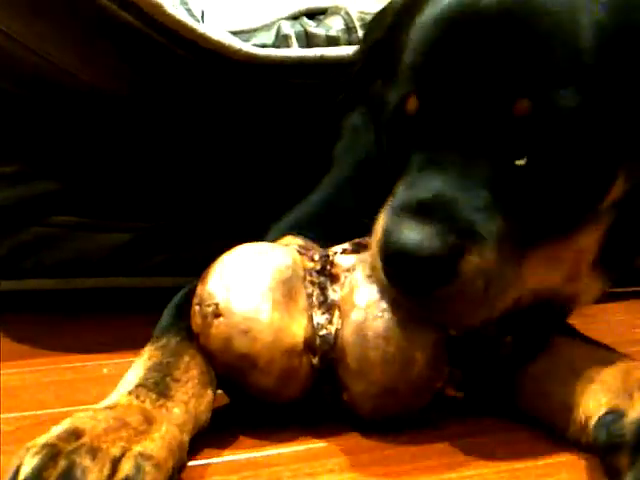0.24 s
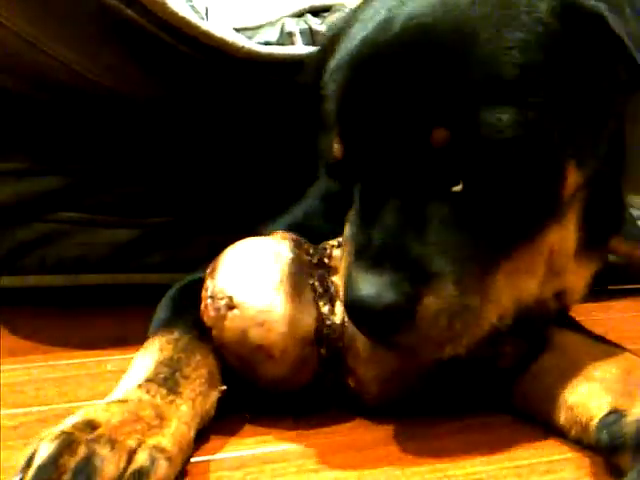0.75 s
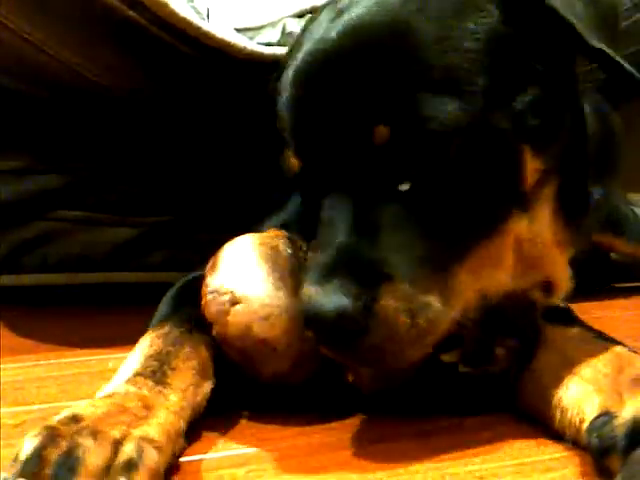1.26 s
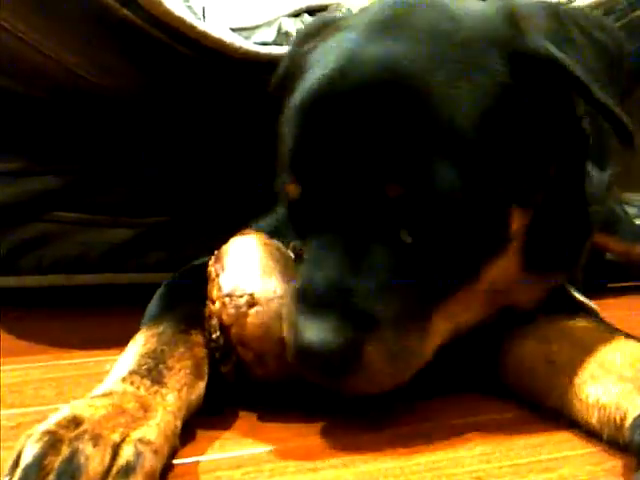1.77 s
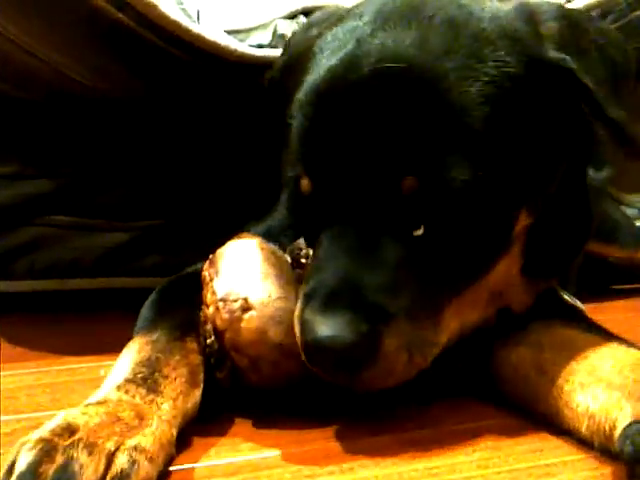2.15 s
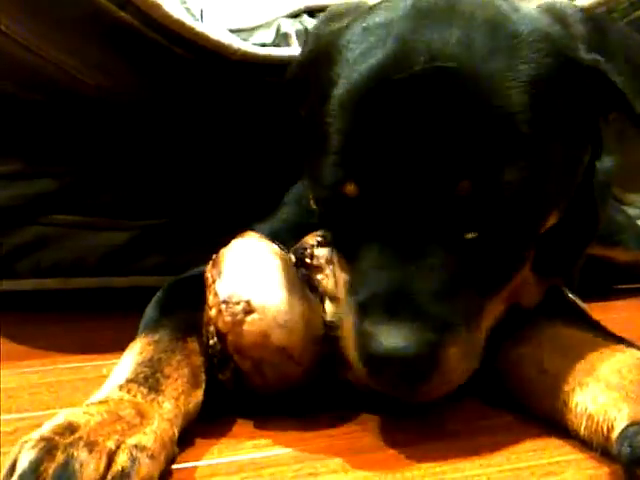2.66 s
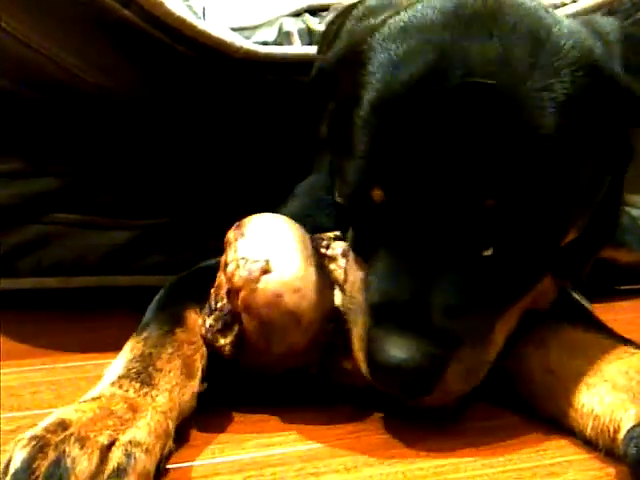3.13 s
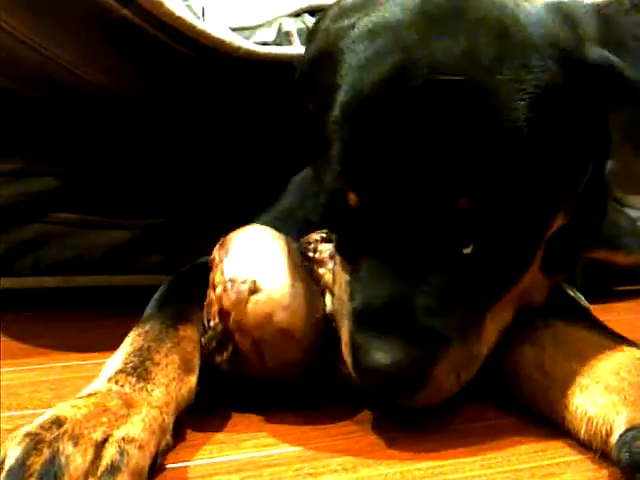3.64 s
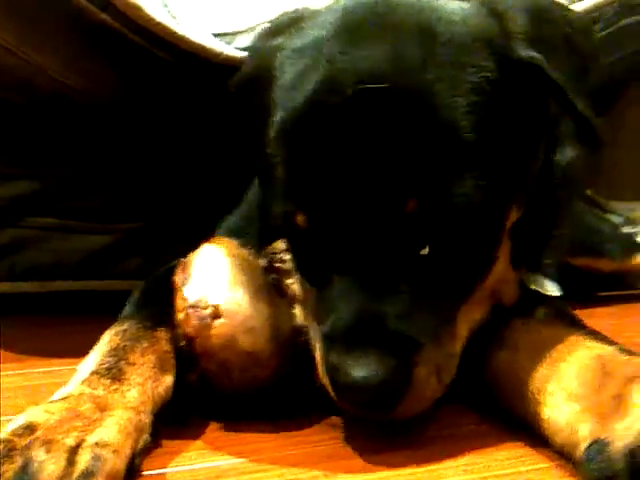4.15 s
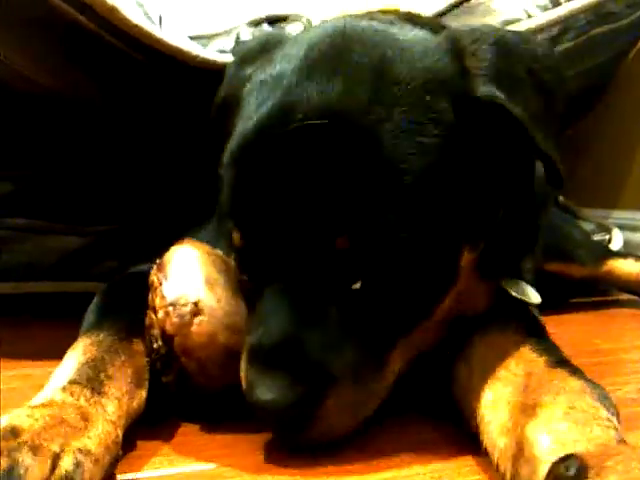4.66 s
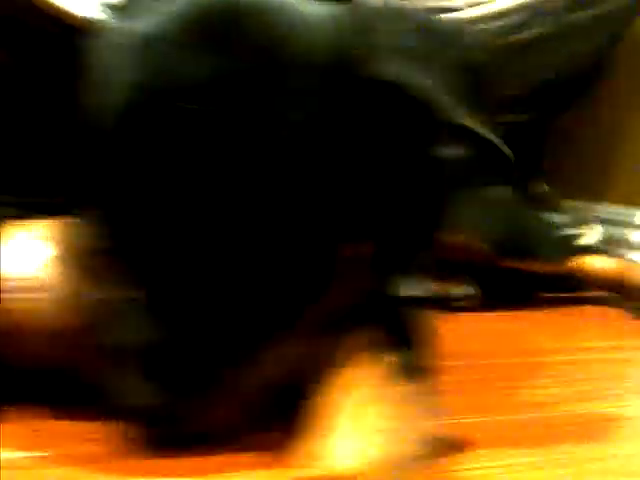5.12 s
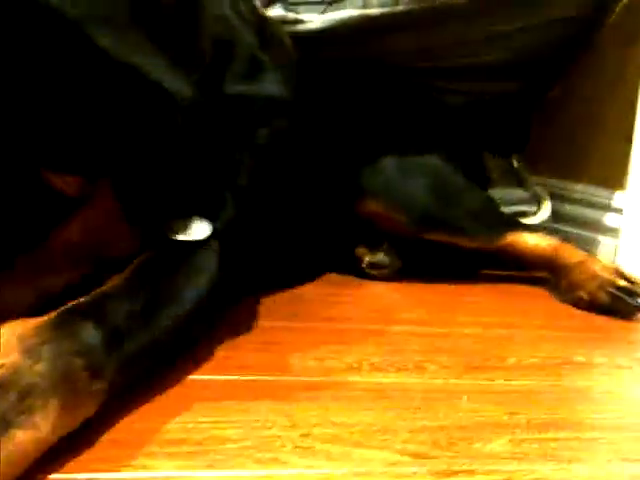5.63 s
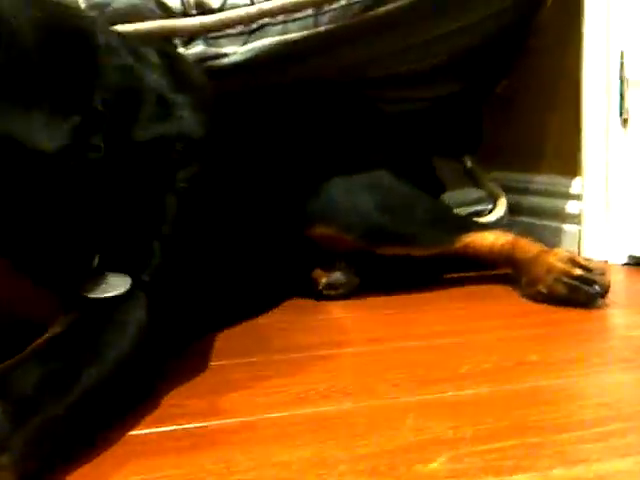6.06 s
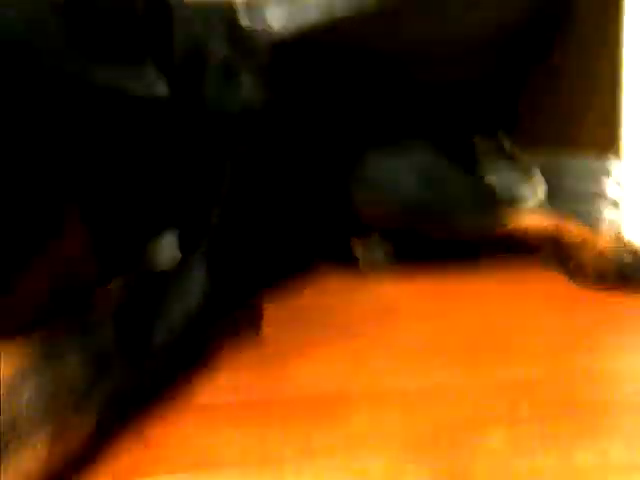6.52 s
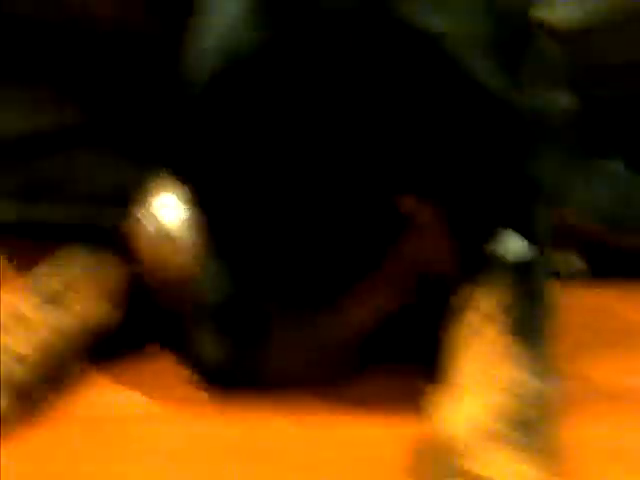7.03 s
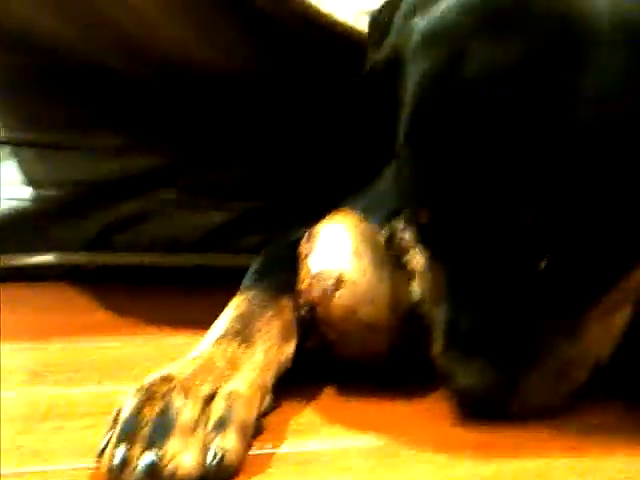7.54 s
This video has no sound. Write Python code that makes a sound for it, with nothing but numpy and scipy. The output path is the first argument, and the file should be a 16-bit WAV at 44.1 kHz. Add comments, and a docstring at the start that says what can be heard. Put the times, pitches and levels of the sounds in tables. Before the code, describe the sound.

A puppy gnaws a large bone on a wooden floor, heard close up in a small room with a short echo and a faint low rush. In the first half second, teeth snap and crunch and the bone slides briefly. Soft bumps of paws and jaw follow, with a cluster of hollow knocks from 1.2 to 1.5 seconds. Light tooth clicks come between 1.8 and 2.4 seconds, then small crunchy knocks. The loudest knocks of bone on boards land at about 3.3, 3.9 and 4.4 seconds, with a quick burst of splintering clicks just before the last. Dull thuds follow near 5.1 and 5.6 seconds. From 6.2 to 7.5 seconds the teeth click, nibble and grate busily, among short slides and lighter knocks. A faint, smooth hiss swells and fades twice, peaking around 5.5 and 7.1 seconds.

```python
"""Puppy gnawing a bone

A puppy chews a big knuckle bone on a wooden floor in a small, echoing room. The bone rocks,
knocks and slides, making the boards ring. Teeth click, scrape and splinter it, while paws and
jaw bump it softly. Twice a smooth hiss swells and fades."""
import sys
import numpy as np
from scipy import signal
from scipy.fft import rfft, irfft
from scipy.io import wavfile

SR = 44100
rng = np.random.default_rng(int(sys.argv[2]) if len(sys.argv) > 2 else 0)


def wav_record(signal):
    """Record a signal, one row per channel, as 16-bit PCM in the file named by sys.argv[1]."""
    frames = np.transpose(np.atleast_2d(signal))
    bounded = np.clip(frames, -1, 1)
    # unit amplitude maps onto the largest positive 16-bit level
    quanta = np.round(bounded * 32767).astype(np.int16)
    wavfile.write(sys.argv[1], SR, quanta)


N = 343539

# Tones of bone and boards together: pitch_hz, level_db, ring_s (time to fade by 60 dB)
BONE_TONES = [(205.8, -23.5, 0.21), (280, -4, 0.027), (430, -0.1, 0.039), (512, -2.5, 0.022),
              (722, 2, 0.014), (1198, 11.5, 0.0053), (1530, -19.5, 0.025), (2160, -12, 0.0084),
              (2490, -9.5, 0.011), (3150, -8, 0.0053), (3780, -13, 0.017), (3630, 20, 0.00021)]
# Bare bone hitting the floor: start_s, level_db, hardness_hz (higher is sharper), crunch_db, pitch_ratio
BONE_KNOCKS = [(0.1574, -38.5, 750, -37, 0.88), (0.7012, -40, 640, -25, 1.04),
               (0.7863, -48.5, 800, -39, 1.03), (1.2154, -30, 850, -25.5, 1),
               (1.3829, -25.5, 800, -25, 0.99), (1.4589, -31, 750, -26, 0.98),
               (2.6754, -31.5, 700, -21, 1.01), (2.9117, -40.5, 720, -16.5, 1),
               (3.3009, -16.5, 950, -21, 1.036), (3.332, -32.5, 700, -32, 1.73),
               (3.342, -27.5, 750, -39, 1.36), (3.8544, -17.5, 740, -23.5, 1),
               (4.3856, -18.5, 1005, -16.5, 1.065), (4.4, -31, 700, -40, 0.82),
               (5.0792, -40, 644, -37, 0.84), (6.6632, -35.5, 1300, -37, 0.92),
               (6.8567, -42, 1050, -29, 0.82), (6.873, -43, 700, -34, 1.08), (7.4307, -31, 850, -19, 1.03)]

def knocks():
    """The bone drops on the boards and both ring; how it is held shifts the pitch."""
    return blows(BONE_KNOCKS, BONE_TONES, BONE_TONES, crunch_s=0.0078, crunch_hz=3650,
                 chatter_s=0.00908, chatter_db=-10.5, chatter_hz=1500,
                 edge_hz=2630, gain_db=2.5, order=2)


# The floor bending under a slow, heavy push: pitch_hz, level_db, ring_s
FLOOR_TONES = [(170.8, -7, 0.046)]
# Padded bumps of paws and jaw: start_s, level_db, hardness_hz, crunch_db
SOFT_BUMPS = [(0.2645, -38.5, 550, -11), (0.318, -43, 168, -33), (0.35, -34.5, 290, -41),
              (0.6635, -44, 201, -35), (0.768, -38, 197, -32), (0.981, -52, 170, -36),
              (1.078, -40.5, 167, -45), (1.1448, -37, 180, -30), (1.323, -36, 280, -17),
              (1.3435, -29, 260, -27.5), (1.4102, -29, 310, -22), (1.8645, -35.5, 159, -26),
              (2.0637, -47, 265, -31), (2.2808, -43.5, 395, -25), (2.8958, -40.5, 352, -7.5),
              (3.6009, -30, 197, -22.5), (3.6083, -32, 417, -7), (4.0782, -27, 516, -15),
              (4.178, -38.5, 300, -16.5), (4.251, -31, 250, -21), (4.3513, -34.5, 318, -16),
              (4.771, -38.5, 170, -26.5), (5.0585, -24, 340, -24.5), (5.216, -43, 300, -22),
              (5.5582, -28, 305, -19), (5.8009, -47.5, 400, -12), (6.2823, -36.5, 220, -28.5),
              (6.496, -40, 150, -26), (6.992, -41.5, 169, -37), (7.637, -43.5, 205, -23)]

def bumps():
    """Paws and jaw push the bone against the boards with a soft thud and a dull crunch."""
    contacts = [(*bump, 1) for bump in SOFT_BUMPS]   # pitch ratio 1
    return blows(contacts, FLOOR_TONES + BONE_TONES, BONE_TONES, crunch_s=0.0078, crunch_hz=1550,
                 chatter_s=0.01157, chatter_db=-8, chatter_hz=900,
                 edge_hz=9200, gain_db=-2.5, order=3)


# Tones of a tooth hitting bone: pitch_hz, level_db, ring_s
TOOTH_TONES = [(476, -2, 0.0083), (800, 5.5, 0.043), (940, 18.5, 0.0032), (1500, 1, 0.0022),
               (2030, -2, 0.059)]
# The thin ring of splintering bone: pitch_hz, level_db, ring_s
SPLINTER_TONES = [(2114, -2, 0.05), (4330, 2.5, 0.0066), (5470, 4.5, 0.006), (5840, -8.5, .005)]
# Teeth snapping over the bone: start_s, level_db, hardness_hz, crunch_db, pitch_ratio
TOOTH_SNAPS = [(.2205, -31, 750, -20, 0.99), (.2544, -38, 900, -11, 0.8), (.3172, -25, 1270, -5, 0.99),
               (.3462, -39.5, 900, 2, 0.93), (.451, -35, 710, -26, 1.23), (.4945, -40, 1070, 0.5, 1),
               (1.146, -39, 800, -21, 0.79), (1.788, -42.5, 1600, 0, 0.82), (1.8245, -44.5, 1600, -4, 1.04),
               (1.8545, -38.5, 1100, -12, 1.05), (1.884, -49, 900, -12, 1.5), (1.911, -48, 900, -14, 1),
               (1.9314, -41.5, 940, -9, 1.02), (1.977, -40, 900, -16, 1), (2.014, -53, 1200, -16, 1.5),
               (2.283, -47, 700, -22, 0.83), (2.299, -45, 700, -20, 0.98), (2.317, -55, 1500, 3, 0.84),
               (2.422, -51, 900, -17, 1.07), (4.156, -40, 1100, -10, 1.15), (4.177, -32, 800, -22, 0.98),
               (4.1975, -36.5, 1100, -8, 1.06), (4.2435, -33, 1100, -5, 0.95), (4.2505, -44, 1100, 2, 1.14),
               (4.272, -32.5, 1350, -11, 0.88), (4.2895, -29.5, 1220, -9, 1),
               (4.8688, -41.5, 1300, -11, 0.93), (6.164, -47.5, 1003, -7, 1.07),
               (6.2832, -43.5, 750, -18, 0.86), (6.371, -47, 1910, -7, 1.2), (6.4008, -41, 1300, -14, 0.79),
               (6.4974, -30.5, 2400, -9, .96), (6.628, -36.5, 900, -20.5, 0.97),
               (6.774, -45, 3000, 12, 1.1), (6.8326, -40, 900, -23, 0.76), (6.9005, -43, 1200, -16, 1),
               (6.9345, -38.5, 800, -17, 1.1), (7.102, -45.5, 1290, -18, 0.81),
               (7.204, -38.5, 900, -18, 0.89)]

def teeth():
    """A tooth slips off a ridge and clacks on the bone, which splinters with a sharp snap."""
    return blows(TOOTH_SNAPS, TOOTH_TONES, SPLINTER_TONES, crunch_s=0.0028, crunch_hz=5800,
                 chatter_s=0.00475, chatter_db=-6.0, chatter_hz=3000,
                 edge_hz=2700, gain_db=-9.5, order=2)


# Tones of a tooth's edge on the spongy end of the bone: pitch_hz, level_db, ring_s
GRATING_TONES = [(790, 5.5, 0.013), (1100, 3.5, 0.011), (1500, 13.5, 0.0027), (1850, -6.5, 0.0069),
                 (2113, 1.5, 0.052)]
# Strokes of the teeth: middle_s, length_s, level_db
TOOTH_RASPS = [(.311, 0.012, -49), (4.27, 0.11, -60), (6.332, 0.025, -46), (6.409, 0.015, -55.5),
               (6.503, 0.042, -42), (6.53, 0.17, -57.5), (6.58, 0.015, -50.5), (6.645, 0.025, -51),
               (7.105, 0.025, -49), (7.21, 0.034, -52), (7.275, 0.049, -49), (7.49, 0.041, -50),
               (7.54, 0.014, -42)]

def rasps():
    """Teeth drag over the rough bone and grate."""
    return scraping(TOOTH_RASPS, GRATING_TONES, slips_per_s=390, spread_db=3.0, edge_hz=1800, order=6)


# Slides across the floor: middle_s, length_s, level_db
BONE_SLIDES = [(.1, 0.15, -57.5), (.16, 0.044, -46), (.195, 0.013, -51), (.455, 0.15, -43),
               (1.14, 0.0082, -52), (1.18, 0.018, -49), (1.335, 0.03, -40), (1.372, 0.025, -45),
               (2.93, 0.09, -46.5), (3.293, 0.079, -45), (4.22, 0.31, -49), (5.77, 0.14, -54.5),
               (6.68, 0.11, -43.5), (6.96, 0.096, -55), (7.215, 0.04, -62), (7.28, 0.023, -52),
               (7.538, 0.019, -46), (7.775, 0.11, -55)]

def slides():
    """The bone rubs along the boards with a dull scrape."""
    return scraping(BONE_SLIDES, BONE_TONES, slips_per_s=570, spread_db=-0.5, edge_hz=940)


# Hard bites: middle_s, length_s, level_db
HARD_BITES = [(.325, 0.043, -59), (4.185, 0.065, -64.5), (4.275, 0.1, -60.5), (6.505, 0.047, -60)]

def crunches():
    """The bone's crust gives way in a quick run of tiny cracks."""
    return scraping(HARD_BITES, SPLINTER_TONES, slips_per_s=600, spread_db=3.0, edge_hz=3400)


# Spells of nibbling: middle_s, length_s, level_db
NIBBLE_SPELLS = [(2.15, 0.88, -92), (6.05, 0.85, -70), (7.05, 0.41, -59.5)]

def nibbles():
    """Teeth catch lightly on the bone in small, uneven ticks."""
    return scraping(NIBBLE_SPELLS, GRATING_TONES, slips_per_s=63, spread_db=2.5, edge_hz=1420)


# Small wet crumbs splitting off: start_s, peak_db, pitch_hz
WET_CRUMBS = [(1.568, -47, 5840), (1.668, -49.5, 4860), (2.392, -56, 1100), (5.475, -44.5, 1250)]

def crumbs(snap_s=0.00094, width_octaves=0.45):
    """A wet crumb parts with a thin tick that lasts a few milliseconds."""
    out, t = np.zeros(N), np.arange(SR // 20) / SR
    half_width = 2 ** (width_octaves / 2)
    for start_s, peak_db, pitch_hz in WET_CRUMBS:
        burst = rng.standard_normal(len(t)) * t * np.exp(-t / snap_s)
        tick = band_pass(burst, pitch_hz / half_width, pitch_hz * half_width, order=4)
        add(out, start_s, from_db(peak_db) * tick / np.abs(tick).max())
    return out


# Spells of restless shifting: middle_s, length_s, level_db
RESTLESS_SPELLS = [(.27, 0.91, -54.5), (.72, 0.21, -51.5), (1.87, 0.34, -57), (4.22, 0.23, -53),
                   (6.5, 3, -62.5)]

def shifting(resting_db=-63, soft_hz=137):
    """Never quite still, paws and jaw keep nudging the bone against the boards."""
    nudges = low_pass(grains(per_s=76, spread_db=3.0), soft_hz)
    return (from_db(resting_db) + effort(RESTLESS_SPELLS)) * rms_one(ring(nudges, BONE_TONES))


def low_thump(start_s=3.301, peak_db=-38, top_hz=60):
    """A faint, very deep thump sounds under the loudest knock."""
    out, thump = np.zeros(N), low_pass(signal.unit_impulse(SR // 5), top_hz)
    add(out, start_s, from_db(peak_db) * thump / thump.max())
    return out


def blows(contacts, tones, crunch_tones, crunch_s, crunch_hz, chatter_s, chatter_db, chatter_hz,
          edge_hz, gain_db, order):
    """Each contact is a rattling push, longer when soft, plus a crunch; gain_db shifts every level."""
    out = np.zeros(N)
    for start_s, level_db, hardness_hz, crunch_db, pitch_ratio in contacts:
        touches = rattle(chatter_s, chatter_db, chatter_hz)
        push = low_pass(touches, hardness_hz, order)
        rounded_push = low_pass(push, edge_hz, order=4)
        crunch = from_db(crunch_db) * low_pass(grit(crunch_s), crunch_hz, order=3)
        sound = ring(rounded_push, tones, pitch_ratio) + ring(crunch, crunch_tones, pitch_ratio)
        sound *= np.sqrt(SR // 100) / np.linalg.norm(sound)   # the energy of 10 ms at strength 1
        add(out, start_s, from_db(level_db + gain_db) * sound)
    return out


def rattle(chatter_s, chatter_db, chatter_hz, count=4):
    """One touch, then a few weaker, duller ones as the surfaces settle on each other."""
    touches = np.zeros(SR // 5)
    when, strength = rng.random((2, count))
    after_s = chatter_s * (.15 + when)
    sizes = from_db(chatter_db) * (.5 + strength) * (1 - when / 2)
    np.add.at(touches, (after_s * SR).astype(int), sizes)
    return signal.unit_impulse(len(touches)) + low_pass(touches, chatter_hz)


def grit(length_s):
    """A brief crackle, about equally strong at all pitches."""
    fading = np.exp(-np.arange(SR // 5) / SR / length_s)
    spectrum = rfft(rng.standard_normal(len(fading)) * fading)
    burst = irfft(spectrum / np.abs(spectrum), len(fading)) * np.sqrt(fading)
    return burst / np.linalg.norm(burst)


def hollow(x, dip_hz=900, width_hz=62, depth=0.64):
    """Bone and boards partly cancel each other near one pitch, which makes the knocks hollow."""
    return x - depth * band_pass(x, dip_hz - width_hz / 2, dip_hz + width_hz / 2, order=1)


def scraping(strokes, tones, slips_per_s, spread_db, edge_hz, order=2):
    """A dragged surface catches and slips, and each slip makes it ring."""
    slips = low_pass(grains(slips_per_s, spread_db), edge_hz, order)
    return effort(strokes) * rms_one(ring(slips, tones))


def grains(per_s, spread_db):
    """Tiny taps of uneven size at random times."""
    sizes = from_db(spread_db * np.minimum(rng.exponential(1, N), 4))
    signs = rng.choice([-1, 1], N)
    return sizes * signs * (rng.random(N) < per_s / SR)


def effort(strokes):
    """Each stroke builds and relaxes in a bell shape."""
    t = np.arange(N) / SR
    return sum(from_db(level_db) * np.exp(-8 * ((t - middle_s) / length_s) ** 2)
               for middle_s, length_s, level_db in strokes)


def ring(force, tones, pitch_ratio=1):
    """A push sets an object shaking at its own tones, each fading at its own rate."""
    out = 0
    for pitch_hz, level_db, ring_s in tones:
        decay = from_db(-60 / (ring_s * SR))
        angle = 2 * np.pi * pitch_hz * pitch_ratio / SR
        feedback = [1, -2 * decay * np.cos(angle), decay * decay]
        out = out + from_db(level_db) * signal.lfilter([1, 0, -1], feedback, force + 1e-18)
    return out


# Tones that linger between the walls (standing waves): pitch_hz, level_db, ring_s
ROOM_TONES = [(173.7, 1.5, 0.31), (236.3, -20.5, 0.037), (385.4, 1, 0.14), (463.5, 1.5, 0.2),
              (495, -7, 0.33), (539, -13, 0.78), (720, -16, 0.2), (900, -22.5, 0.33), (1250, -17, 0.2),
              (1536, -26.5, 0.26)]
# Strength of the echoes from low to high: pitch_hz, level_db
ECHO_COLOUR = [(110, -32.5), (175, -4), (300, -7), (500, -8.5), (800, 0), (1200, -3), (2000, -1.5),
               (4000, -2.5), (7000, -5)]
# How long the echoes last: pitch_hz, ring_s
ECHO_LENGTHS = [(100, 0.92), (250, 0.34), (500, 0.59), (1200, 0.61), (3000, 0.58), (7000, 0.7)]

def room(x, first_echo_s=0.006, build_s=0.00062, echo_db=-4.0, tones_db=-65.5, patterns=4):
    """Wall echoes blur into a fading tail, and the room's own tones ring within it."""
    t = np.arange(SR * 2 // 3) / SR
    edges_hz, tails = np.geomspace(70, 9000, 15), 0
    for low, high in zip(edges_hz, edges_hz[1:]):
        hz = np.sqrt(low * high)
        band = band_pass(rng.standard_normal((patterns, len(t))), low, high, order=2)
        band *= from_db(-60 * t / at_hz(ECHO_LENGTHS, hz)) * (1 - np.exp(-t / build_s))
        band /= np.linalg.norm(band, axis=1, keepdims=True)
        tails = tails + band * np.sqrt(2 * (high - low) / SR) * from_db(at_hz(ECHO_COLOUR, hz))
    # the bone keeps moving, so the pattern of echoes changes every half second
    place = np.arange(N) // (SR // 2) % patterns
    echoes = sum(signal.oaconvolve(x * (place == k), tail)[:N] for k, tail in enumerate(tails))
    out = np.zeros(N)
    add(out, first_echo_s, from_db(echo_db) * echoes + from_db(tones_db) * ring(x, ROOM_TONES))
    return out


# Strength of the hiss from low to high: pitch_hz, level_db
HISS_COLOUR = [(150, -21), (250, -24), (386, -1), (453, -3.5), (731, -6), (870, -2.5), (1160, -2),
               (3260, -15), (6440, -15.5), (7230, -23), (8000, -48), (10400, -98), (17600, -120)]
# Swells of hiss: loudest_s, level_db
HISS_SWELLS = [(5.469, -57), (7.134, -54.5)]

def hiss(rise_s=0.84, fall_s=0.54):
    """Smooth noise swells slowly and fades a little faster."""
    t, loudness = np.arange(N) / SR, 0
    for loudest_s, level_db in HISS_SWELLS:
        ramp = np.interp(t, [loudest_s - rise_s, loudest_s, loudest_s + fall_s], [0, 1, 0])
        loudness = loudness + from_db(level_db) * np.sin(np.pi / 2 * ramp) ** 2
    return loudness * coloured_noise(HISS_COLOUR)


# Strength of the room's background noise from low to high: pitch_hz, level_db
QUIET_COLOUR = [(15, -53), (25, -11), (60, 3.5), (172, 6.5), (308, 3), (382, 1), (523, -0.5), (576, 5),
                (650, -2), (1590, -9.5), (2830, -17), (4380, -22), (4940, -21), (5710, -25.5), (6280, -17),
                (8000, -33), (10400, -72.5), (17600, -120)]

def quiet_room(level_db=-62):
    """A faint, low rush fills the room."""
    return from_db(level_db) * coloured_noise(QUIET_COLOUR)


def coloured_noise(colour):
    """Steady noise with a given balance of low and high pitches."""
    hz = np.maximum(np.fft.rfftfreq(N, 1 / SR), 1)
    spectrum = rfft(rng.standard_normal(N)) * from_db(at_hz(colour, hz))
    return rms_one(irfft(spectrum, N))


def from_db(db):
    """Turns decibels into a multiplier."""
    return 10 ** (np.asarray(db) / 20)


def rms_one(x):
    """Scales a sound to an average strength (rms) of 1."""
    return x / np.sqrt(np.mean(x ** 2) + 1e-20)


def at_hz(table, hz):
    """Reads a table at any pitch, gliding between its rows."""
    pitches_hz, values = np.array(table).T
    return np.interp(np.log(hz), np.log(pitches_hz), values)


def add(out, start_s, sound):
    """Mixes a sound in at its time."""
    at = max(0, round(start_s * SR))
    out[at:at + len(sound)] += sound[:max(0, N - at)]


def low_pass(x, hz, order=2):
    """Dulls a sound above a pitch; a higher order cuts more steeply."""
    return signal.sosfilt(signal.butter(order, hz, fs=SR, output="sos"), x)


def band_pass(x, low_hz, high_hz, order):
    """Keeps the part of a sound between two pitches."""
    return signal.sosfilt(signal.butter(order, [low_hz, high_hz], "band", fs=SR, output="sos"), x)


def scene():
    """Everything the puppy does is heard directly; all but the tiny crumbs also echo."""
    knocking, bumping, snapping = hollow(knocks()), bumps(), teeth()
    small_sounds = rasps() + slides() + shifting() + nibbles() + crunches()
    direct = knocking + bumping + snapping + small_sounds + crumbs()
    to_walls = from_db(-2.0) * knocking + from_db(-0.7) * bumping
    to_walls += from_db(-2.5) * (snapping + small_sounds)
    # the same knocks with a fresh random rattle, sent only to the room for smoother echoes
    knock_echoes = from_db(-4.0) * knocks()
    echoes = room(to_walls) + room(knock_echoes)
    # cut the deep bass from the gnawing and its echoes
    bass_cut = signal.butter(5, 140, "high", fs=SR, output="sos")
    gnawing = signal.sosfilt(bass_cut, direct + echoes)
    return (gnawing + low_thump() + quiet_room() + hiss())[None]


def record(dry):
    """A small microphone cuts off the highest pitches steeply."""
    return low_pass(dry, hz=7300, order=16)


dry = scene()
out = record(dry)
wav_record(out)
```